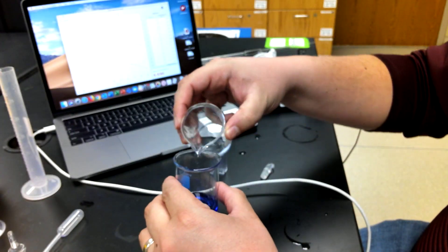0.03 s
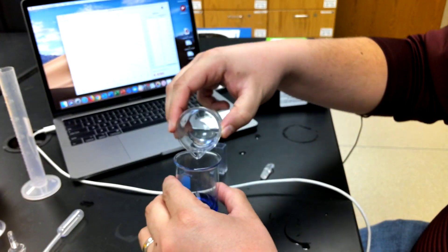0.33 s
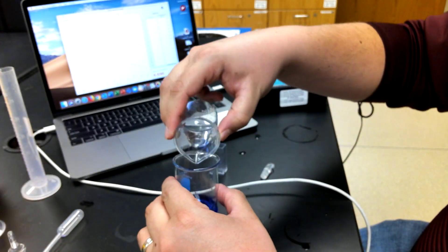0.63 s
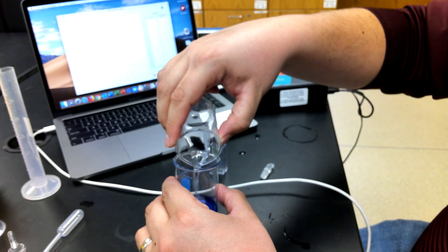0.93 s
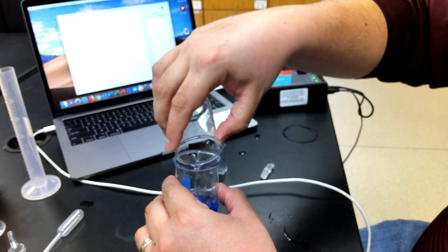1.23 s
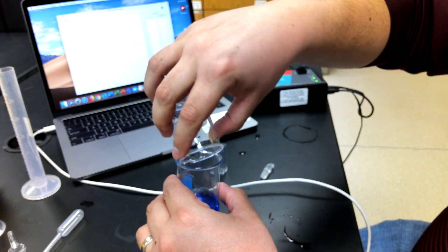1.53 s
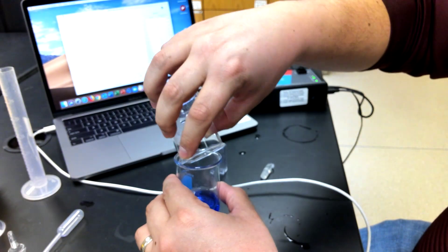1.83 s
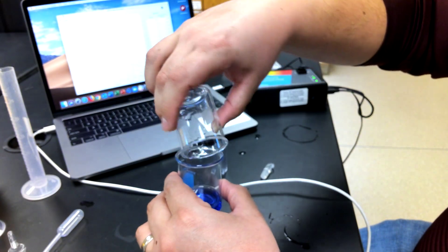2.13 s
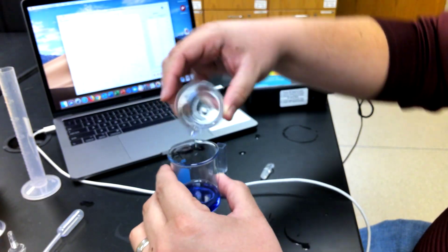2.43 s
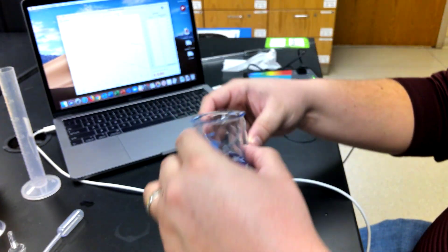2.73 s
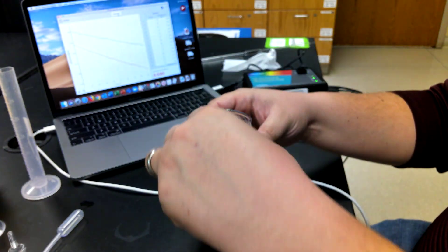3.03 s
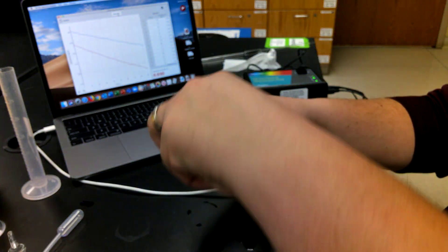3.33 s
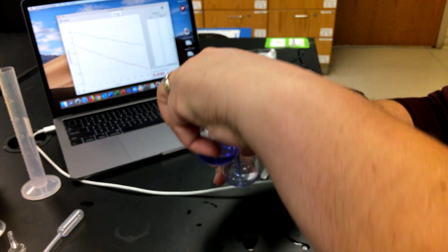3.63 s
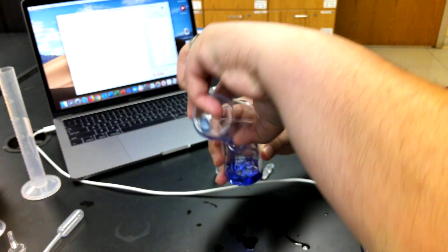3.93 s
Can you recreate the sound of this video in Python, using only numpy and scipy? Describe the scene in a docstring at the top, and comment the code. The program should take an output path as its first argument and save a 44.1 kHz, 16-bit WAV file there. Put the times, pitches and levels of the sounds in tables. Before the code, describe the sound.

Light, bright clinks of two glass beakers touching, with ventilation humming in a quiet room.

```python
"""A bright clink of glass sounds over the low rumble of ventilation in a quiet room.
Two small hand-held beakers touch as one is emptied into the other. Each impact gives a dry tick,
a low knock and a ping of the rim, and excites natural modes that the fingers soon damp.
Once the rims scrape, driven by stick-slip friction; hands and sleeves brush faintly."""
import sys
import numpy as np
from scipy import signal
from scipy.fft import irfft
from scipy.io import wavfile

SR = 44100
rng = np.random.default_rng(int(sys.argv[2]) if len(sys.argv) > 2 else 0)


def log_audio(samples):
    """Write samples as a 16-bit WAV file to the path given in sys.argv[1]."""
    # one column per channel
    frames = np.atleast_2d(samples).T
    # limit to full scale, then quantise
    limited = np.clip(frames, -1, 1)
    pcm = np.round(limited * 32767).astype(np.int16)
    wavfile.write(sys.argv[1], SR, pcm)


N = 176400

# Reverberation of the room (frequency [Hz], t60 [s])
ROOM_DECAY = [(500, .4), (3000, 0.39), (8000, 0.38), (14000, .22)]
# Spectrum of the ventilation (frequency [Hz], relative level [dB])
AIR_SPECTRUM = [(8, -3), (16, 4), (35, -1.5), (66, -12.5), (100, -10), (138, -13), (160, -16.5), (195, -17),
                (255, -20.5), (360, -23), (490, -27), (610, -30.5), (900, -28), (1400, -33), (1750, -37),
                (2200, -39), (2750, -45.5), (4300, -48.5), (6500, -49), (8200, -48), (10500, -53.5),
                (14400, -53.5), (14900, -82)]
# Fan tones (frequency [Hz], level [dB])
FAN_TONES = [(108, -49), (139, -47.5), (282, -58), (570, -55), (649, -56.5)]
# Brushes of hands and sleeves (peak time [s], rise [s], fall [s], level [dB])
BRUSH_STROKES = [(.41, 0.058, 0.076, -57.5), (1.232, 0.027, 0.058, -43), (2.65, 0.11, .04, -52.5),
                 (2.77, .04, .04, -59), (3.465, 0.034, 0.057, -47.5), (3.995, 0.0074, .03, -47)]
# Spectrum of the brushing (frequency [Hz], relative level [dB])
BRUSH_SPECTRUM = [(1000, -6), (3000, -8), (5500, -0.5), (7000, 4.5), (8100, 8), (9200, 2), (11000, -10),
                  (14500, -18)]
# Slips of rim on rim (time [s], relative level [dB], t60 [s])
RIM_SLIPS = [(0.8717, -36.5, 0.029), (0.881, -32.5, .055), (0.8873, -37, 0.066), (.895, -36, .1)]
# Spectrum of the contact tick (frequency [Hz], relative level [dB])
TICK_SPECTRUM = [(300, 3), (800, -12), (1200, 11), (1800, -1.5), (2400, -3.5), (3000, 2.5), (4000, 0.5),
                 (5200, -0.5), (6500, -4), (7300, -7), (7900, 13.5), (8500, 1.5), (9400, -8), (11000, -22),
                 (12200, -21), (14500, -32)]
# Modes of the scraped rim, the pouring beaker and the receiving beaker's wall and lip
# (frequency [Hz], relative level [dB], t60 [s])
RIM_MODES = [(3070, -8, .05), (4603, -6.5, .08), (4820, -11, .1), (5410, -7, .05), (8510, 0, .11),
             (8430, -3, .08), (8570, -10, .07), (8760, -3, .04)]
POURING_MODES = [(1405, -13.5, 0.14), (2450, -9, 0.03), (3810, -15.5, 0.069), (4340, -13.5, 0.053),
                 (4950, -12, 0.041), (5464, -18, .08), (6134, -4, 0.089), (7550, -13, .08), (8240, -8, .07)]
WALL_MODES = [(2955, -0.5, 0.094), (3710, -9.5, 0.078), (4100, -23, 0.062)]
LIP_MODES = [(5384, 2.5, 0.057), (12000, -15, 0.086), (12720, -16, .06)]
# Impacts (time [s], tick level [dB], tick t60 [s], tick tilt [dB/octave], knock level [dB],
# knock frequency [Hz], clack level [dB], clack frequency [Hz], ping level [dB], ping frequency [Hz],
# ping t60 [s], pouring beaker gain [dB], wall gain [dB], lip gain [dB],
# share of t60 left by the grip [ratio], room gain [dB])
IMPACTS = [ (0.0609, -22.5, 0.064, 0.5, -27, 1210, -35, 3800, -17.5, 7860, 0.07, -14.5, -60, -52, 0.9, -11),
           (1.202, -37, 0.022, -1, -55, 1100, -46, 5600, -60, 8000, .03, -58, -64, -49, .4, -14),
           (1.2260, -34, .04, -6, -48, 1110, -40, 4050, -41, 8200, .04, -60, -54, -50, .5, -13),
           (1.4778, -22, .02, -.5, -35, 1030, -25, 3850, -18, 8150, .042, -55, -37, -39, .6, -13),
           (1.5205, -42, .025, 2, -33, 1020, -45, 4500, -46, 8140, .03, -70, -58, -58, .5, -17),
           (1.9132, -27.5, .055, -1, -26.5, 900, -29, 3820, -38, 8000, .06, -55, -41, -42, 0.65, -16),
           (2.1393, -24, 0.084, -0.5, -21.5, 1096, -24.5, 3880, -15, 7973, 0.071, -55, -25.5, -22, 0.82, -12.5),
           (3.149, -27, 0.045, -6, -26.5, 1264, -27, 2340, -22, 7720, 0.027, -65, -28, -62, 0.35, -21),
           (3.207, -50, .025, -5, -31.5, 1364, -45, 3400, -70, 7700, .03, -75, -65, -75, .5, -20),
           (3.71, -23.5, 0.03, -1, -26.5, 1090, -30.5, 5200, -12, 7660, 0.018, -58, -31, -50, 0.53, -13.5),
           (3.7916, -35, .02, -3, -49, 1070, -37, 4200, -20.5, 7910, 0.019, -65, -32.5, -62, 0.31, -17), ]

STRIKE_S, KNOCK_RISE_S = 0.00075, 0.00067
KNOCK_T60, CLACK_T60 = 0.055, 0.023
OVERTONE_HZ, OVERTONE_DB, OVERTONE_T60 = 10760, -28, 0.047  # the rim's next mode, relative to the ping
TWIN_OFFSET_HZ, TWIN_DB, TWIN_T60 = 220, -19, 0.013  # a weak mode just above the ping
RING_IN_ROOM_DB, SHIMMER_DB, SHIMMER_TILT_DB = -6.5, 3, 5.5  # glass sends more treble into the room


def amp(db):
    """Amplitude grows tenfold for every 20 dB."""
    return 10 ** (np.asarray(db) / 20)


def unit(x):
    """Normalisation to an rms of 1."""
    return x / np.sqrt(np.mean(x ** 2) + 1e-20)


def read(points, hz):
    """Interpolation of a table on a log-frequency axis."""
    f, value = np.transpose(points)
    return np.interp(np.log(hz + 1), np.log(f + 1), value)


def add(mix, start_s, sound):
    """Superposition: a sound adds to the mix from its onset."""
    part = mix[round(start_s * SR):][:len(sound)]
    part += sound[:len(part)]


def noise(spectrum, size, tilt_db=0):
    """Fourier synthesis: random phases give noise of rms 1, tilted per octave above 1 kHz."""
    hz = np.fft.rfftfreq(size, 1 / SR)
    octaves = np.log2(np.maximum(hz, 1000) / 1000)
    gain = amp(read(spectrum, hz) + tilt_db * octaves)
    return unit(irfft(gain * np.exp(2j * np.pi * rng.random(len(hz))), size))


def ring(modes, grip=1, rise=STRIKE_S):
    """Free vibration: each mode is a damped sinusoid, its decay time scaled by the grip."""
    t = np.arange(SR // 2) / SR
    waves = sum(amp(db - 60 * t / (t60 * grip)) * np.sin(2 * np.pi * hz * t) for hz, db, t60 in modes)
    return waves * (1 - np.exp(-t / rise))


def room(x, delay_s=0.006):
    """Reverberation: sparse reflections of random sign decay exponentially, fastest in the treble."""
    reflections = rng.choice([-1., 1.], SR) * (rng.random(SR) < .1)
    hz, t, bands = signal.stft(reflections, SR, nperseg=256)
    decay = amp(-60 * t / read(ROOM_DECAY, hz)[:, None])
    tail = signal.istft(bands * decay, SR, nperseg=256)[1]
    tail = np.concatenate([np.zeros(round(delay_s * SR)), tail])
    return signal.fftconvolve(x, tail / np.linalg.norm(tail))[:N]


def ventilation(air_db=-27, tone_width_hz=8.5):
    """Broadband air noise rumbles under fan tones, which waver as narrow-band noise does."""
    hz = np.fft.rfftfreq(N, 1 / SR)
    hum = np.zeros(N)
    for centre_hz, db in FAN_TONES:
        peak = 1 / (1 + (2 * (hz - centre_hz) / tone_width_hz) ** 2)
        phases = np.exp(2j * np.pi * rng.random(len(hz)))
        hum += amp(db) * unit(irfft(peak * phases, N))
    return amp(air_db) * noise(AIR_SPECTRUM, N) + hum


def brushes(grit_db=1.5, grit_s=0.0042):
    """Sliding friction: noise swells and fades with each hand movement, roughened by uneven catches."""
    t = np.arange(N) / SR
    envelope = sum(amp(db) * np.exp(-np.maximum((peak_s - t) / rise, (t - peak_s) / fall))
                   for peak_s, rise, fall, db in BRUSH_STROKES)
    catches = np.interp(t / grit_s, np.arange(N), rng.standard_normal(N))
    return envelope * unit(amp(grit_db * catches)) * noise(BRUSH_SPECTRUM, N)


def tick(t60, tilt_db):
    """Contact transient: glass chatters on glass in a broadband burst that decays exponentially."""
    blocks = [noise(TICK_SPECTRUM, 512, tilt_db) for _ in range(SR // 1024 + 1)]
    burst = np.concatenate(blocks)[:SR // 2]
    t = np.arange(len(burst)) / SR
    return burst * amp(-60 * t / t60) * (1 - np.exp(-t / STRIKE_S))


def scrape(tick_db=-2, room_db=-5):
    """Forced vibration: stick-slip friction ticks and drives the rim's modes in a few quick bursts."""
    friction, direct = np.zeros((2, N))
    t = np.arange(SR // 2) / SR
    for start_s, db, t60 in RIM_SLIPS:
        add(friction, start_s, amp(db - 60 * t / t60) * rng.standard_normal(len(t)))
        add(direct, start_s, amp(db + tick_db) * tick(t60, tilt_db=0.7))
    rim = ring(RIM_MODES)
    direct += signal.fftconvolve(friction, rim / np.linalg.norm(rim))[:N]
    return direct + amp(room_db) * room(direct)


def impacts():
    """Impulse excitation: each touch rings both beakers; the spot touched sets the clack's pitch."""
    out = np.zeros(N)
    for (start_s, tick_db, tick_t60, tilt_db, knock_db, knock_hz, clack_db, clack_hz,
         ping_db, ping_hz, ping_t60, pour_db, wall_db, lip_db, grip, room_db) in IMPACTS:
        contact = amp(tick_db) * tick(tick_t60, tilt_db)
        knock = ring([(knock_hz, knock_db, KNOCK_T60)], rise=KNOCK_RISE_S)
        clack = ring([(clack_hz, clack_db, CLACK_T60)], rise=KNOCK_RISE_S)
        ping = ring([(ping_hz, ping_db, ping_t60), (OVERTONE_HZ, ping_db + OVERTONE_DB, OVERTONE_T60)])
        twin = ring([(ping_hz + TWIN_OFFSET_HZ, ping_db + TWIN_DB, TWIN_T60)])
        pouring = amp(pour_db) * ring(POURING_MODES, grip)
        receiving = amp(wall_db) * ring(WALL_MODES, grip) + amp(lip_db) * ring(LIP_MODES, grip)
        direct, shimmer = np.zeros((2, N))
        add(direct, start_s, contact + knock + clack + ping - twin + pouring + receiving)
        add(shimmer, start_s, amp(tick_db + SHIMMER_DB) * tick(tick_t60, tilt_db + SHIMMER_TILT_DB))
        out += direct + amp(room_db) * room(amp(RING_IN_ROOM_DB) * direct + shimmer)
    return out


def scene():
    """Superposition: the pressures of all sources add in one channel."""
    return (ventilation() + impacts() + scrape() + brushes())[None]


def record(dry, cutoff_hz=14850):
    """Band limiting: a low-pass filter removes the highest treble."""
    lowpass = signal.firwin(511, cutoff_hz, window=("kaiser", 9), fs=SR)
    return signal.oaconvolve(dry, lowpass[None], "same")


dry = scene()
out = record(dry)
log_audio(out)
```